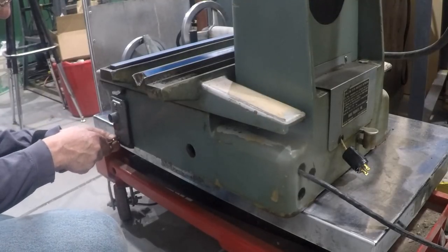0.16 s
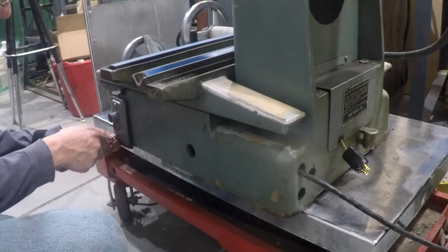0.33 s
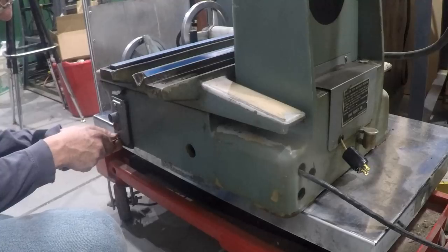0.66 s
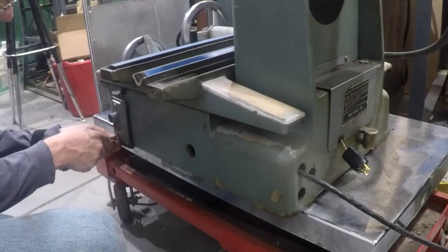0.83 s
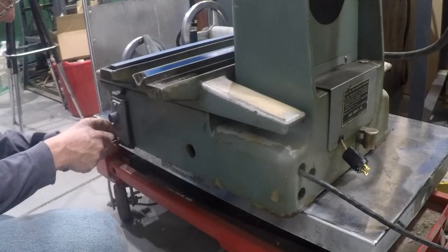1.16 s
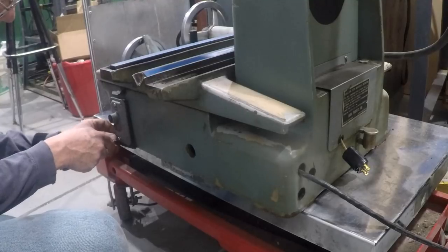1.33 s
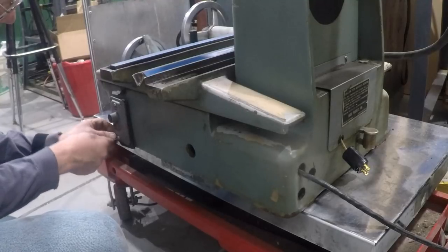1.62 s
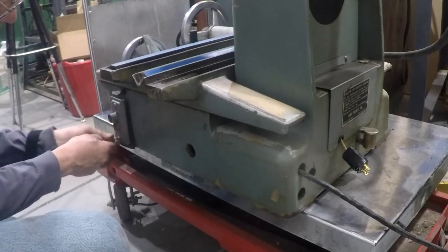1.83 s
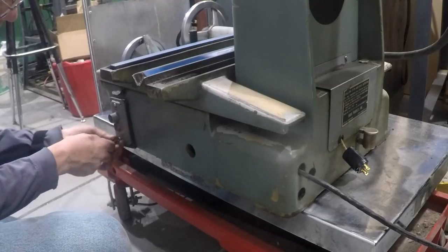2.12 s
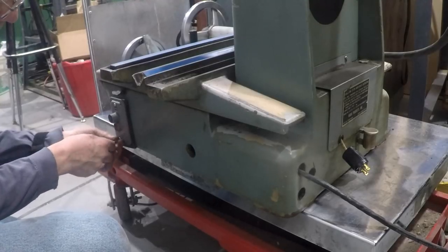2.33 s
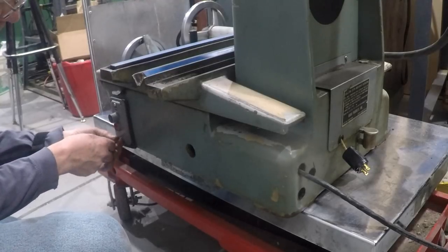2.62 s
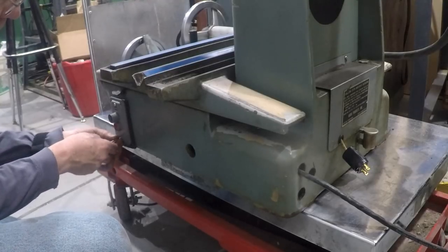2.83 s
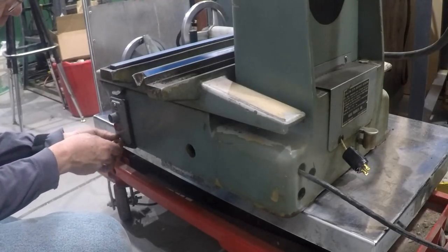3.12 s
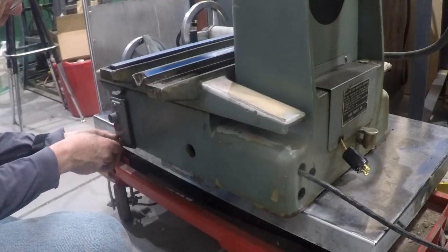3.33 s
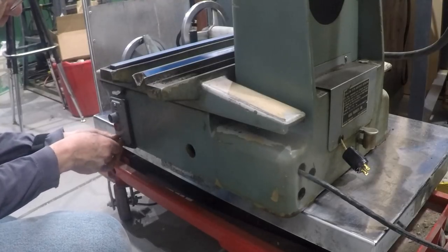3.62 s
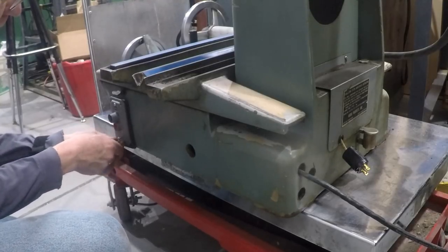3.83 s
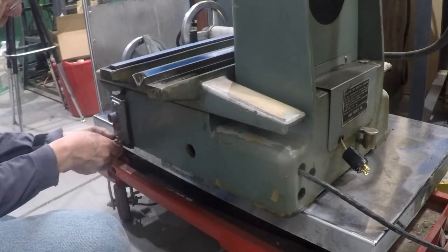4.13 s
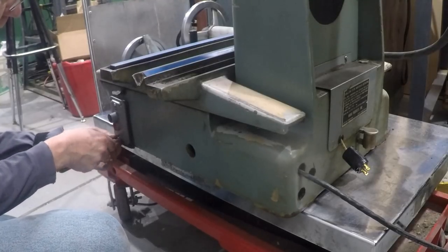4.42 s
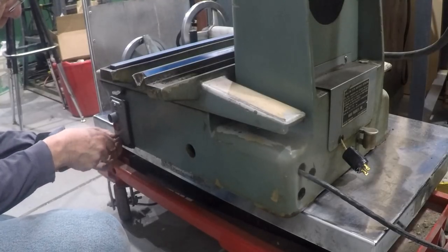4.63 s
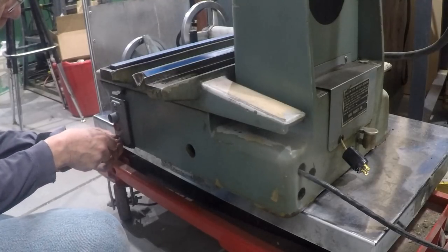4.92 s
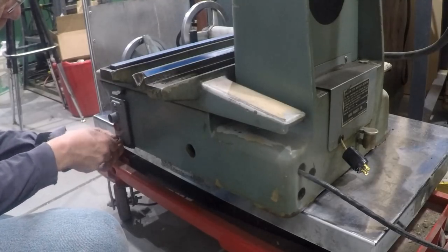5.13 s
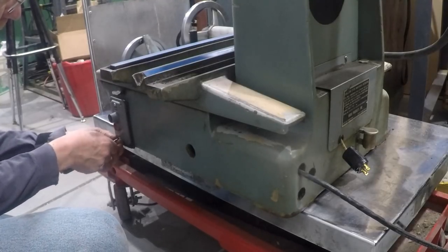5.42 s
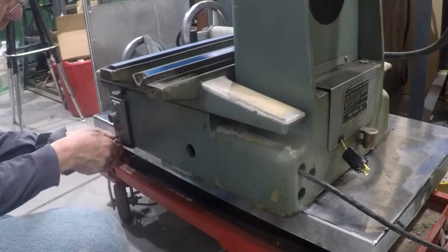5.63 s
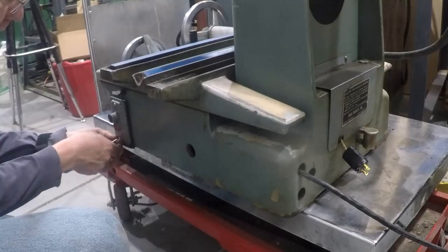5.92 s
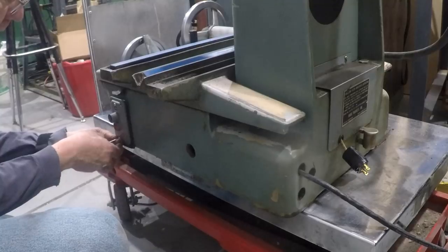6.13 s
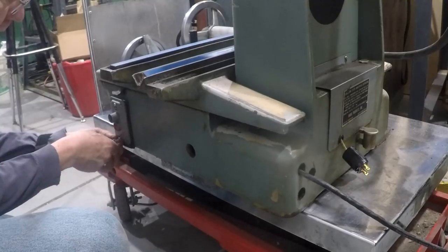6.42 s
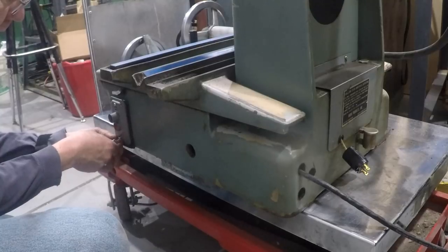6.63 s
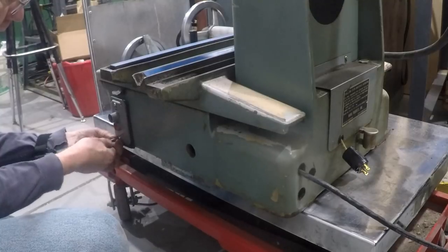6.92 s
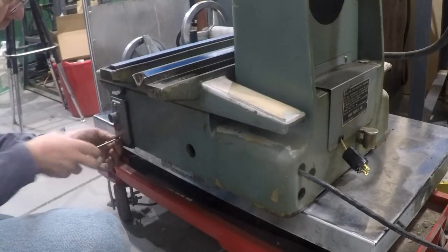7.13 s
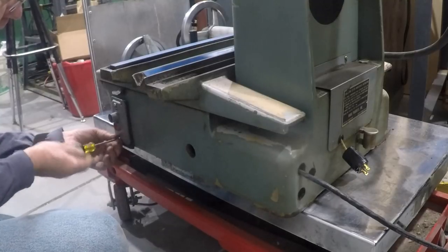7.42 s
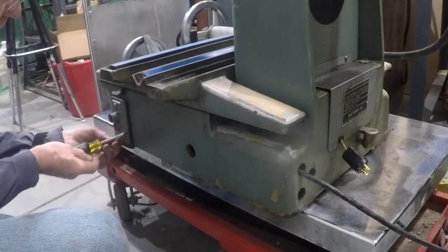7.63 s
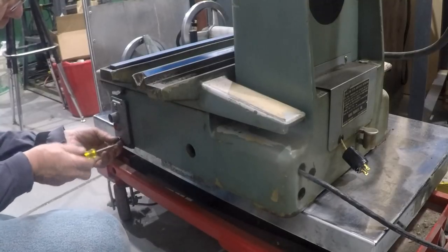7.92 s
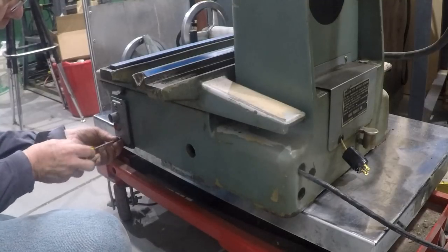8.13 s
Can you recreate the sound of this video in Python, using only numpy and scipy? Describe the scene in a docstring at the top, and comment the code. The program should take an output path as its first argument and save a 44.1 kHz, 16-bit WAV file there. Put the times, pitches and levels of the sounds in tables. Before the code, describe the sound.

A screwdriver blade ticks and scrapes in a screw on an iron machine base, with two loud metal clanks over a low motor hum.

```python
"""A screw is worked into the cast-iron base of a workshop machine: the blade ticks and scrapes in the slot.
These contacts are short noise bursts sent through the resonances of blade and screw.
A loose steel fitting clanks loudly twice, among softer touches; knocks and groans make the casting ring:
both are sums of fading sine waves. A sleeve swishes as the hand draws back (shaped noise),
and behind it a motor hums (three slightly unsteady sines) over room noise and rumble."""
import sys
import numpy as np
from scipy import signal
from scipy.fft import rfft, irfft, next_fast_len
from scipy.io import wavfile
from scipy.ndimage import uniform_filter1d, map_coordinates

SR = 44100
rng = np.random.default_rng(int(sys.argv[2]) if len(sys.argv) > 2 else 0)


def wrap_up_sound(samples):
    """Save the sound to the file named by the first command line argument, as 16-bit audio."""
    columns = np.atleast_2d(samples).T
    # keep every value between -1 and 1, then stretch to whole-number steps
    tamed = np.clip(columns, -1, 1)
    steps = np.round(tamed * 32767).astype(np.int16)
    wavfile.write(sys.argv[1], SR, steps)


N = 364266  # length in samples


def amp(db):
    """Turn decibels into a gain."""
    return 10 ** (np.asarray(db) / 20)


def unit(x):
    """Scale to rms 1."""
    return x / np.sqrt(np.mean(x ** 2) + 1e-20)


def burst(x):
    """Scale so that the loudest 5 ms have rms 1."""
    power = uniform_filter1d(x ** 2, size=220, mode="constant")
    return x / np.sqrt(power.max() + 1e-20)


def along(points, hz):
    """Read a curve of (f/Hz, value) points on a log frequency axis."""
    f, v = np.transpose(points)
    return np.interp(np.log(hz + 1), np.log(f + 1), v)


def wobble(rate):
    """A smooth random curve with `rate` random points a second."""
    knots = rng.standard_normal(int(N * rate / SR) + 4)
    coarse = np.arange(0, N, SR // 700)
    curve = map_coordinates(knots, [coarse * rate / SR])
    return np.interp(np.arange(N), coarse, curve)


def swell(middle, width, db):
    """Gain that rises and falls smoothly around one moment (a bell curve; width is its standard deviation)."""
    t = np.arange(N) / SR
    return amp(db) * np.exp(-.5 * ((t - middle) / width) ** 2)


def filtered(x, response):
    """Multiply the spectrum of x by a response of frequency."""
    n = x.shape[-1]
    m = next_fast_len(n + 4096)
    spectrum = rfft(x, m) * response(np.fft.rfftfreq(m, 1 / SR))
    return irfft(spectrum, m)[..., :n]


def coloured(x, points, size=2048):
    """Filter x to the gain of (f/Hz, level/dB) points, with no sound ahead of its cause."""
    gain = amp(along(points, np.fft.rfftfreq(size, 1 / SR)))
    cepstrum = irfft(np.log(gain))
    # folding the cepstrum forward gives the minimum-phase filter
    cepstrum[1:size // 2] *= 2
    cepstrum[size // 2 + 1:] = 0
    impulse = irfft(np.exp(rfft(cepstrum)))
    return signal.fftconvolve(x, impulse)[:len(x)]


def band(x, lo_hz, hi_hz):
    """Keep the band between two frequencies, with no sound ahead of its cause."""
    sos = signal.butter(2, [lo_hz, hi_hz], "band", fs=SR, output="sos")
    return signal.sosfilt(sos, x)


def noise(points):
    """Noise of rms 1 with the given spectrum."""
    return unit(filtered(rng.standard_normal(N), lambda hz: amp(along(points, hz))))


def add(track, s, x):
    """Mix x into the track at s seconds."""
    part = track[max(round(s * SR), 0):][:len(x)]
    part += x[:len(part)]


def resonance(hz, centre_hz, width_hz):
    """How one mode answers each frequency, in strength and phase."""
    return 1j * hz * width_hz / (centre_hz ** 2 - hz ** 2 + 1j * hz * width_hz)


def favour(hz, centre_hz, spread):
    """The point struck favours the modes near one frequency; spread is in octaves."""
    return np.exp(-.5 * (np.log2(hz / centre_hz) / spread) ** 2)


def ring(modes, t, centre_hz, spread, scatter_db, blur, size=16):
    """Modes ring freely at new strengths for every blow; loose contact blurs each by a share of its frequency."""
    hz, db, t60 = np.transpose(modes)
    scattered_db = db + scatter_db * rng.standard_normal(len(hz))
    gain = amp(scattered_db) * favour(hz, centre_hz, spread)
    steps = rng.standard_normal((len(hz), len(t) // size + 1))
    start = 2 * np.pi * rng.random(len(hz))
    out = np.zeros(len(t))
    for k in np.flatnonzero(gain >= gain.max() * amp(-50)):  # skip the weakest modes
        # the phase takes a random walk, one step every `size` samples
        drift = np.cumsum(steps[k]) * np.sqrt(2 * np.pi * blur * hz[k] * size / SR)
        phase = 2 * np.pi * hz[k] * t + start[k] + np.repeat(drift, size)[:len(t)]
        decay = np.exp(-np.log(1000) * t / t60[k])
        out += gain[k] * decay * np.sin(phase)
    return burst(out)


# resonances of the blade seated in the screw: (f/Hz, width/Hz, level/dB)
BLADE_MODES = [(587, 81, 1.5), (659, 90, -13.5), (1990, 150, -8.5), (2697, 204, 0), (4604, 267.5, -17),
               (5320, 1700, -20), (5850, 780, -5), (6897, 280, -5), (7156, 265, -4)]


def blade(force):
    """The resonances of blade and screw answer a force; neighbours have opposite signs."""
    def response(hz):
        return sum((-1) ** k * amp(db) * resonance(hz, centre_hz, width_hz)
                   for k, (centre_hz, width_hz, db) in enumerate(BLADE_MODES))
    return filtered(force, response)


# when the fingers spin the screw: (start t/s, end t/s)
SPINS = [(0.55, 1.45), (1.95, 2.9)]
FAINT_PER_S, FAINT_SCATTER_DB = 6, 2.5  # contacts a second, largest change of level either way


def faint(typical):
    """Loosely spaced rows for each spin, like the typical one; its last two columns are levels and scatter."""
    rows = []
    for start, end in SPINS:
        for k, (place, strength) in enumerate(rng.random((32, 2))):
            s = start + (k + place) / FAINT_PER_S
            levels = np.array(typical[-2:]) + FAINT_SCATTER_DB * (2 * strength - 1)
            if s < end:
                rows.append((s, *typical[:-2], *levels))
    return rows


TICK_REF_DB = -50  # a middling snap
BODY_DB, BODY_GROWS = -50, .66  # its body before trim, and dB of body per dB of snap: harder is brighter
EDGE_HZ, EDGE_SCATTER_OCT = 5980, .07  # the tip's resonance shifts from contact to contact
# blade and screw contacts, levels before trim: (t/s, snap level/dB, low knock level/dB)
TICKS = [(0.314, -50, -47.5), (0.473, -52.5, -40.5), (0.524, -49, -62), (0.697, -50.5, -72),
         (0.836, -50.5, -60), (1.189, -57.5, -51.5), (1.516, -50.5, -59), (1.547, -39, -44.5),
         (1.673, -33.5, -52), (2.02, -61, -48.5), (2.167, -51.5, -47), (2.315, -58, -45), (2.584, -50, -48),
         (2.62, -61, -50.5), (3.508, -53, -66), (3.527, -53, -66), (3.649, -35, -49.5), (3.925, -52, -55.5),
         (4.008, -51, -48), (4.311, -54.5, -60), (4.484, -43.5, -58), (4.827, -49, -57), (5.24, -63, -57.5),
         (5.587, -61.5, -62), (6.022, -40, -62), (6.185, -43, -57), (6.671, -49.5, -60),
         (6.722, -33.5, -62), (7.618, -55, -53), (7.754, -35.5, -51), (7.774, -30, -56)]
# a typical faint tick, before trim: (snap level/dB, low knock level/dB)
FAINT_TICK = (-61, -64)
# colour of a light contact: (f/Hz, level/dB)
SNAP_COLOUR = [(150, -16), (500, -12), (1200, 1), (3000, 0.5), (5500, 7.5), (7300, -16), (8300, -18),
               (10500, -4), (15000, -21)]


def ticks(snap_t60=0.023, chatter_db=-20, chatter_t60=0.21, snap_db=-13, knock_t60=0.04,
          knock_rise=0.00232, tip_width_hz=1500, tip_t60=.1, lag=.0015):
    """Each slip of the blade is a snap with a brief chatter; the heavier low knock swells just after it."""
    out, t = np.zeros(N), np.arange(SR // 8) / SR
    for s, db, knock_db in TICKS + faint(FAINT_TICK):
        fade = amp(-60 * t / snap_t60) + amp(chatter_db - 60 * t / chatter_t60)
        force = rng.standard_normal(len(t)) * fade
        push = rng.standard_normal(len(t)) * amp(-60 * t / knock_t60) * (1 - np.exp(-t / knock_rise))
        snap = blade(force) + amp(snap_db) * coloured(force, SNAP_COLOUR)
        edge_hz = EDGE_HZ * 2 ** (EDGE_SCATTER_OCT * rng.standard_normal())
        tip = filtered(snap, lambda hz: 0.11 + resonance(hz, edge_hz, tip_width_hz))
        body_db = BODY_DB + BODY_GROWS * (db - TICK_REF_DB)
        # three bands from low to high, each with its trim in dB
        knock = amp(knock_db - 3.5) * burst(band(blade(push), 339.5, 980))
        body = amp(body_db - 4.5) * burst(band(snap, 1360, 3400))
        edge = amp(db - 1.7) * burst(band(tip, 3930, 13000) * amp(-60 * t / tip_t60))
        add(out, s + lag, knock + body + edge)
    return out


# firmer rubs of the thread, before trim: (middle t/s, nominal length/s, knock level/dB, rasp level/dB)
STROKES = [(0.51, .025, -66, -57), (0.713, .046, -64.5, -54), (0.835, .08, -51, -54),
           (1.026, 0.039, -49, -58), (1.665, 0.021, -50, -41), (2.783, 0.11, -58.5, -62.5),
           (3.423, .018, -56.5, -45.5), (4.02, .025, -47.5, -48.5), (4.84, .04, -52, -62),
           (4.899, 0.021, -53, -68), (5.964, 0.03, -57, -72), (6.174, .025, -61, -58),
           (6.712, .036, -55, -52), (7.722, .03, -48, -52), (7.766, 0.018, -47, -42)]
# a typical faint rub, before trim: (nominal length/s, knock level/dB, rasp level/dB)
FAINT_RUB = (0.038, -63, -65.5)


def scrapes(slip_rate=420, friction=0.062, level_db=-0.5):
    """Turning the screw drags the thread through a run of tiny slips, on average slip_rate a second."""
    out, t = np.zeros(N), np.arange(SR // 5) / SR
    for s, length, knock_db, rasp_db in STROKES + faint(FAINT_RUB):
        slipping = rng.random(len(t)) < slip_rate / SR
        slips = rng.standard_normal(len(t)) * (friction + slipping)
        stroke = np.exp(-2 * ((t - t.mean()) / length * 1.29) ** 2)
        x = blade(slips * stroke)
        knock = amp(knock_db) * burst(band(x, 350, 899))
        rasp = amp(rasp_db) * burst(band(x, 1800, 8820))
        add(out, s - t.mean(), knock + rasp)
    return amp(level_db) * out


# the fitting hits the base, crack before trim:
# (t/s, ring level/dB, crack level/dB, favoured f/Hz, spread/octaves, ring length factor)
CLANKS = [(0.526, -51, -67, 2700, .6, 1.3), (1.916, -60, -82, 4600, 0.033, 1.6),
          (4.0783, -18, -24, 2950, 1.23, .8), (4.486, -51.5, -68, 5550, 0.48, 1.03),
          (6.723, -44, -38.5, 3620, 0.37, .91), (7.7, -50, -44, 3000, 1, .5),
          (7.712, -39, -37, 7300, .15, 0.46), (7.8383, -21, -21, 2900, 2.1, 0.81),
          (7.84, -38, -60, 11300, 0.27, .59), (7.849, -26.5, -36.5, 4800, .3, 0.47),
          (7.876, -37.5, -61, 1940, .12, .9), (7.879, -49, -59, 4200, .48, 3.1)]
# modes of the steel fitting, before the length factor: (f/Hz, level/dB, t60/s)
STEEL_MODES = [(555, -11, .08), (708, -17, .15), (1510, -19, .08), (1870, -12, .17), (2033, -7, .08),
               (2115, -9, .12), (2365, -11, .12), (2437, -11, .08), (2692, -1, .09), (2765, -5, .22),
               (2940, -2, .12), (3030, -8, .07), (3143, -4, .11), (4435, -4, .14), (4525, -6, .16),
               (4690, -13, .08), (5300, -19, .06), (6330, -6, .11), (6810, -8, .15), (7310, -18, .07),
               (8720, -19, .06), (9240, -26, .05), (11700, -30, .07)]
# colour of a hard contact: (f/Hz, level/dB)
CRACK_COLOUR = [(150, -24), (550, -3), (1200, -11), (2600, -5), (3700, -5), (6500, -2.5), (8500, -15.5),
                (15000, -30.5)]


def clanks(crack_t60=0.029, settle_db=5, settle_t60=0.052):
    """Steel on iron: a crack, then a ring that the hand damps more or less."""
    out, t = np.zeros(N), np.arange(SR // 3) / SR
    for s, ring_db, crack_db, centre_hz, spread, length in CLANKS:
        modes = np.array(STEEL_MODES) * [1, 1, length]
        # a firm grip swallows the first swings
        settle = 1 + amp(settle_db - 60 * t / settle_t60) / length ** 2
        tone = ring(modes, t, centre_hz, spread, scatter_db=0.5, blur=0.0011)
        tone = tone * settle * (1 - np.exp(-t / 0.00031))
        crack = coloured(rng.standard_normal(len(t)) * amp(-60 * t / crack_t60), CRACK_COLOUR)
        add(out, s, amp(ring_db) * burst(tone) + amp(crack_db - 4.5) * burst(crack))
    return out


# knocks that reach the casting, before the swell: (t/s, ring level/dB, thud level/dB, favoured f/Hz, spread/octaves)
KNOCKS = [(1.21, -54.5, -60, 242, .3), (1.665, -55, -49, 700, 1.6), (3.03, -61, -68, 785, .42),
          (3.415, -53, -47, 2300, .6), (4.079, -47, -38, 600, .5), (6.025, -52.5, -51.5, 890, 1.9),
          (6.187, -48, -48, 926, 1.6), (6.724, -42.5, -51, 432, 1.14), (7.706, -48, -40, 597, 1.5),
          (7.779, -50, -40.5, 2000, 1.4), (7.839, -42, -40, 600, 1.6)]
# modes of the casting: (f/Hz, level/dB, t60/s)
CASTING_MODES = [(232, -8, .45), (270, -2, .45), (365, -7, .3), (450, -11, .35), (531, -3, .45),
                 (585, -2, .4), (640, -7, .3), (711, -5, .4), (757, -2, .35), (802, 0, .38), (853, -9, .3),
                 (1523, -4, .3), (1825, -13, .25), (2305, -12, .18), (2645, -8, .16), (2960, -8, .22),
                 (3140, -11, .2)]
# the base's dense short modes: (f/Hz, level/dB)
THUD_COLOUR = [(120, -24.5), (280, -9.5), (450, -7), (620, -5), (820, -11.5), (1100, -10.5), (2000, -8),
               (3100, -8), (3800, -15), (4600, -21.5), (9000, -47.5)]


def casting(rise=0.0025, thud_t60=0.13):
    """The heavy base takes a moment to swell: a dense thud, then a few modes ring on."""
    out, t = np.zeros(N), np.arange(SR // 3) / SR
    for s, ring_db, thud_db, centre_hz, spread in KNOCKS:
        dense = coloured(rng.standard_normal(len(t)), THUD_COLOUR)
        thud = filtered(dense, lambda hz: favour(hz + 1, centre_hz, spread)) * amp(-60 * t / thud_t60)
        tone = ring(CASTING_MODES, t, centre_hz, spread, scatter_db=1.0, blur=0.00259)
        blow = amp(ring_db) * tone + amp(thud_db) * burst(thud)
        add(out, s, blow * (1 - np.exp(-t / rise)))
    return out


GROAN_HZ, GROAN_SPREAD_OCT = 800, .24  # pitch and its spread
GROAN_FALL_DB = 2.8  # loss at the octave; higher multiples fall faster
# the screw binds and the casting groans, level of the lowest multiple before the swell: (t/s, level/dB)
GROANS = [(3.42, -41), (4.014, -43)]


def groans(rise=.003, count=3):
    """A binding screw judders and rings the casting's modes near the first multiples of its pitch."""
    out, t = np.zeros(N), np.arange(SR // 3) / SR
    for s, db in GROANS:
        for k in range(1, count + 1):
            tone = ring(CASTING_MODES, t, k * GROAN_HZ, GROAN_SPREAD_OCT, scatter_db=0.0, blur=0.0045)
            level = amp(db - GROAN_FALL_DB * (k - 1) ** 2)
            add(out, s, level * tone * (1 - np.exp(-t / rise)))
    return out


# the arm draws back: middle (s), width (s) and peak level (dB) of the shuffle and the swish
SHUFFLE_S, SHUFFLE_WIDTH_S, SHUFFLE_DB = 7.18, 0.21, -56.5
SWISH_S, SWISH_WIDTH_S, SWISH_DB = 7.38, .08, -56
# colour of the swish: (f/Hz, level/dB per Hz)
CLOTH_COLOUR = [(240, -36), (400, 1), (791, -1), (1120, -5), (2090, -3.5), (3340, -5.5), (3610, -10),
                (5350, 2.5), (8960, -16), (15000, -28)]
# colour of the low shuffle: (f/Hz, level/dB per Hz)
SHUFFLE_COLOUR = [(120, -29), (190, -2.5), (245, 2.5), (330, -7), (450, -18.5), (800, -39.5)]


def sleeve():
    """Cloth slides as the arm draws back: a low shuffle, then a soft swish of fluttering level."""
    shuffle = swell(SHUFFLE_S, SHUFFLE_WIDTH_S, SHUFFLE_DB) * noise(SHUFFLE_COLOUR)
    flutter = amp(0.89 * wobble(86))
    swish = swell(SWISH_S, SWISH_WIDTH_S, SWISH_DB) * flutter * noise(CLOTH_COLOUR)
    return shuffle + swish


RUMBLE_DB, LOW_ROOM_DB, AIR_DB = -65, -65.5, -66.5  # the room's low end and its noise
DRIFT_DB, DRIFT_PER_S = 1.35, 2.1  # slow drift of the low end
DRAUGHT_DB = -57  # peak rumble of the arm's draught
# motor lines: (f/Hz, level/dB)
HUM_LINES = [(90.3, -57.5), (150.8, -68), (229.5, -75)]
# colour of the room noise, before its low cut: (f/Hz, level/dB per Hz)
AIR_COLOUR = [(12, -40), (20, -10.5), (42, -3), (59, -8.5), (74, -4), (92, 0), (115, -21.5), (152, -12.5),
              (180, -26), (281, -18.5), (351, -27.5), (438, -20), (504, -34), (563, -25), (903, -32.5),
              (1230, -32), (1910, -34.5), (2140, -33), (4290, -35.5), (5060, -30.5), (15400, -43)]


def workshop():
    """A slightly unsteady motor hum over room noise and rumble, which swells as the arm moves."""
    t = np.arange(N) / SR
    hum = np.zeros(N)
    for hz, db in HUM_LINES:
        level = amp(db + .5 * wobble(3.42))
        hum += level * np.sin(2 * np.pi * hz * t + .15 * wobble(1))
    steady = amp(RUMBLE_DB + DRIFT_DB * wobble(DRIFT_PER_S))
    draught = swell(SWISH_S, 2 * SWISH_WIDTH_S, DRAUGHT_DB)
    rumble_colour = [(8, -27), (22, -1.0), (35, -0.5), (58, -3), (110, -8), (200, -38)]
    rumble = np.hypot(steady, draught) * noise(rumble_colour)
    low_gain = amp(LOW_ROOM_DB + DRIFT_DB * wobble(DRIFT_PER_S) + 1.1 * wobble(6))
    low = low_gain * noise([(70, -25.5), (118, 0), (190, -6.5), (270, -4.5), (340, -11.5), (600, -34.5)])
    air = unit(filtered(noise(AIR_COLOUR), lambda hz: 1 / (1 + (300 / (hz + 1)) ** 4)))  # cut the lows
    return hum + rumble + low + amp(AIR_DB) * air


# how long the workshop's echo lasts: (f/Hz, t60/s)
ROOM_DECAY = [(200, 0.56), (700, 0.6), (3000, 0.33), (7000, 0.22), (14000, .12)]


def room(x, delay=.006):
    """The workshop's tail is fading noise that starts after a short delay; treble dies first."""
    hz, t, z = signal.stft(rng.standard_normal(SR // 2), SR, nperseg=256)
    fade = amp(-60 * t / along(ROOM_DECAY, hz)[:, None])
    tail = signal.istft(z * fade, SR, nperseg=256)[1]
    tail = tail / np.linalg.norm(tail)
    return signal.fftconvolve(x, np.pad(tail, (int(delay * SR), 0)))[:N]


def scene():
    """All sources sit in the middle; only a faint hiss differs between the sides."""
    work = ticks() + scrapes() + clanks() + casting() + groans()
    mid = work + amp(-15) * room(work) + sleeve() + workshop()
    side = amp(-75.0) * noise([(100, -6.5), (3000, -4), (7000, -1.5), (15000, -2)])
    return np.array([mid + side, mid - side])


TOP_HZ = 15500


def record(dry):
    """Nothing above the band limit is kept."""
    return filtered(dry, lambda hz: hz < TOP_HZ)


dry = scene()
out = record(dry)
wrap_up_sound(out)
```